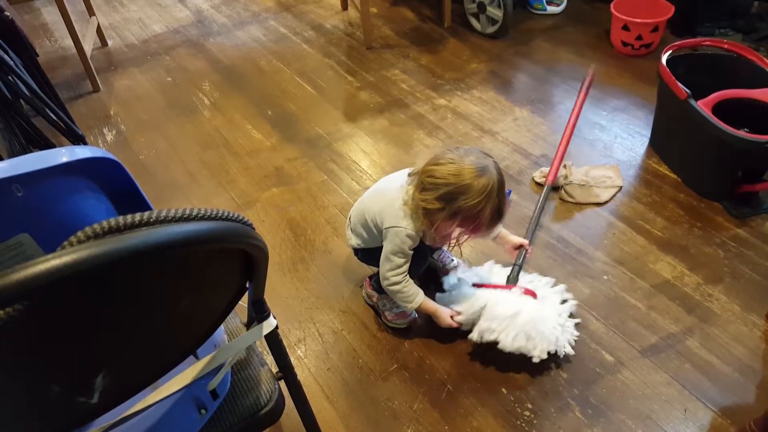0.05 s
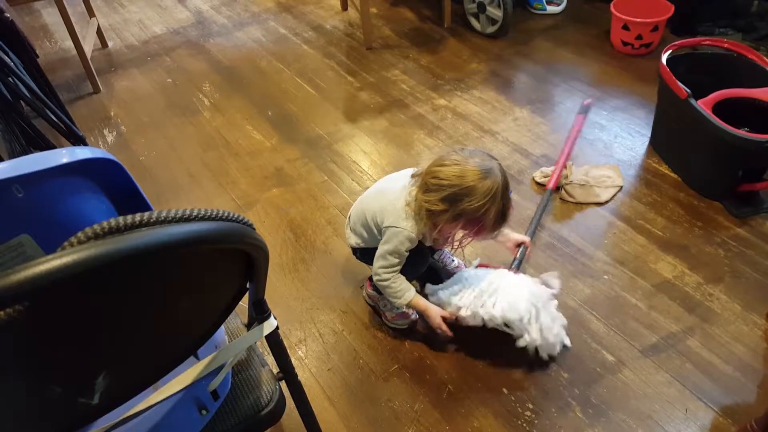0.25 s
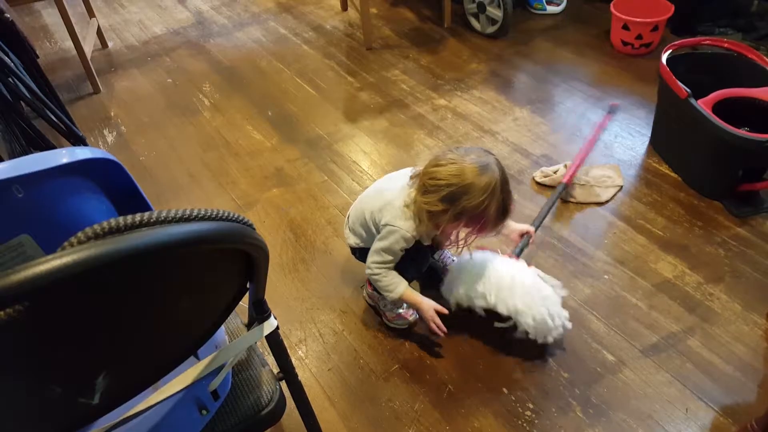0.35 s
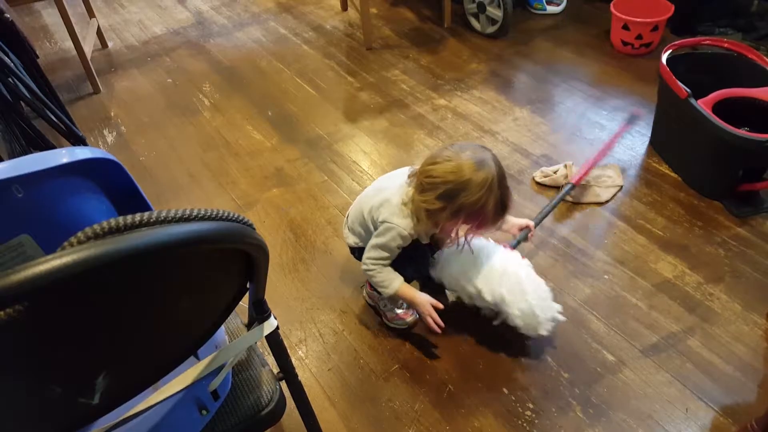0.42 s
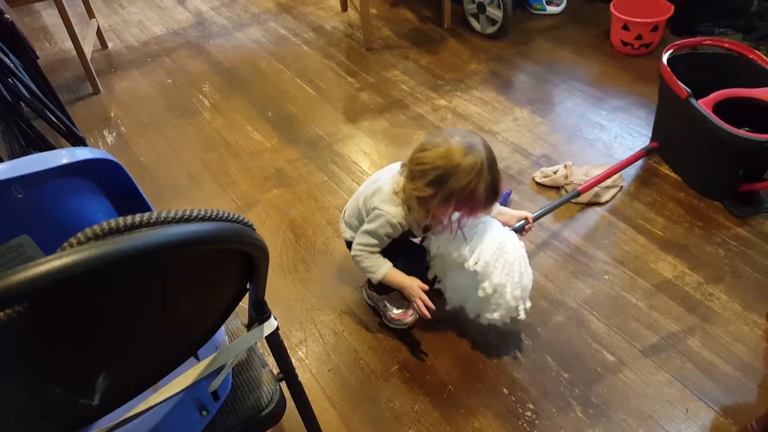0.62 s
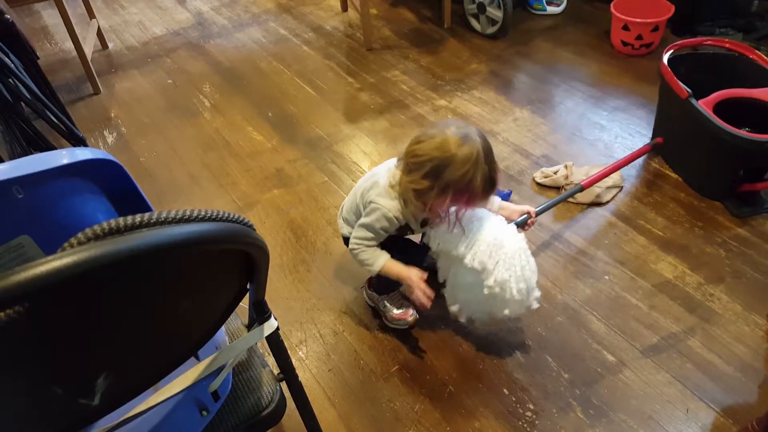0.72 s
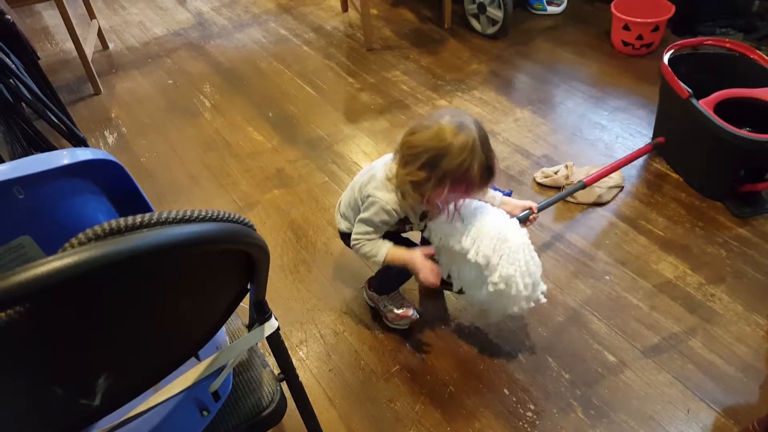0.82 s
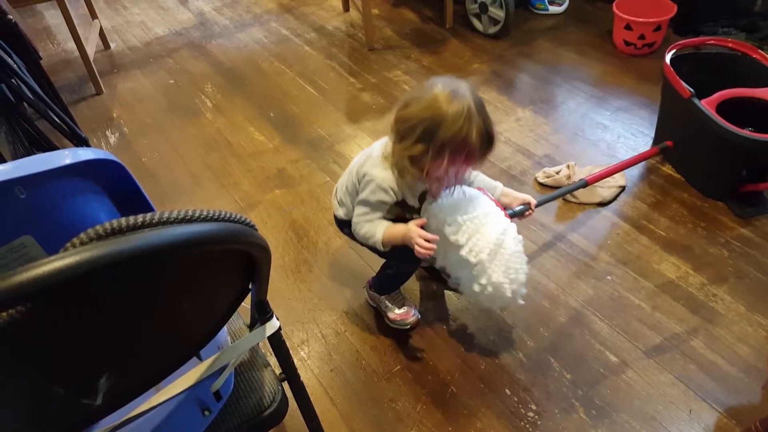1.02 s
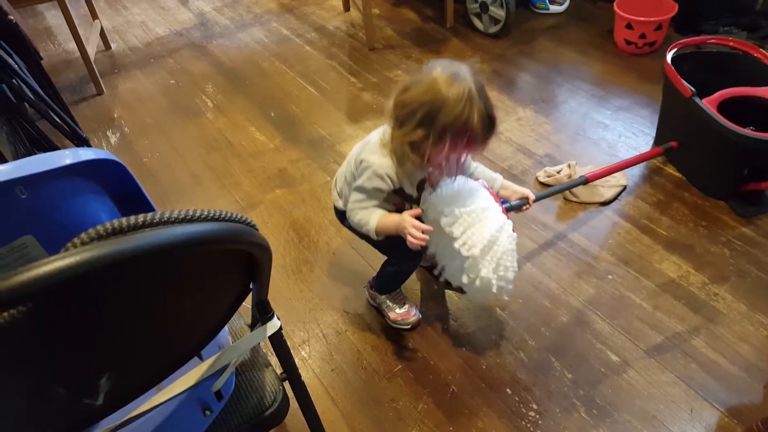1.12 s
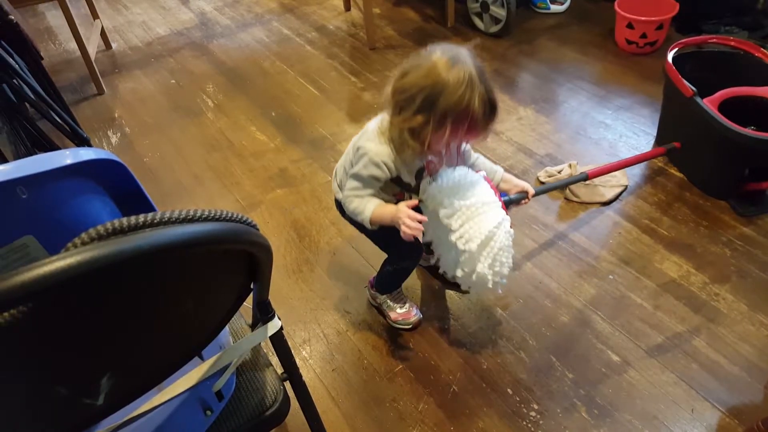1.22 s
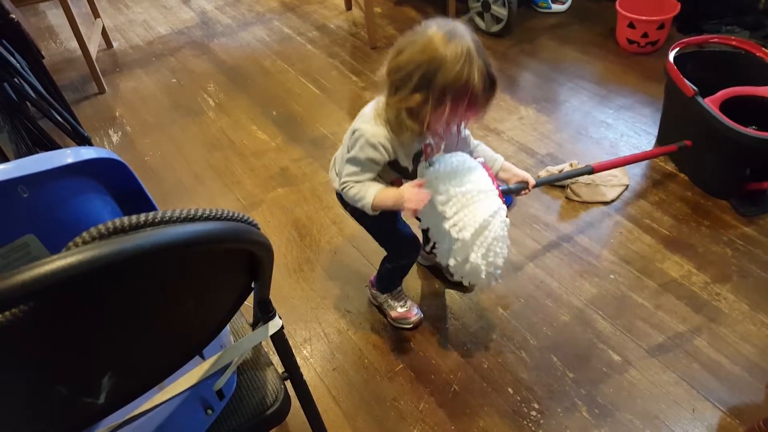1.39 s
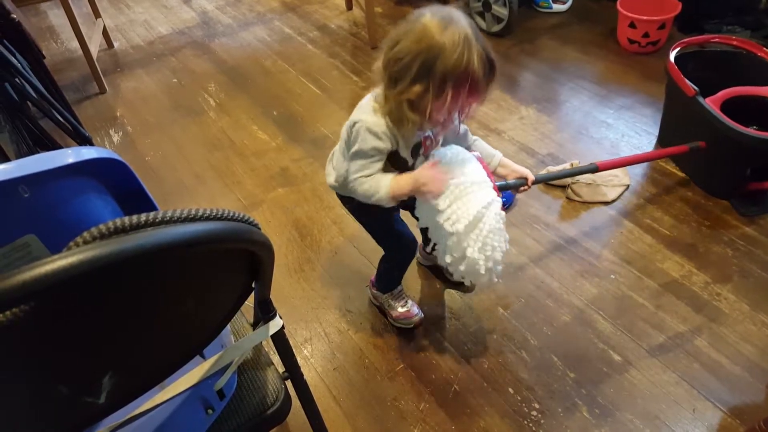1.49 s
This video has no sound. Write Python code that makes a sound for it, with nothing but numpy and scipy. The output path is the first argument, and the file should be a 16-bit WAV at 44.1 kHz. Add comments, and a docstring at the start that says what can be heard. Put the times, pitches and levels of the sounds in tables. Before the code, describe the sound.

A mop's metal handle hits a wooden floor with a sharp, ringing knock. Lighter knocks against floor and bucket follow, the plastic joint clunks, and the tip starts scraping. Heard in stereo in a slightly reverberant room.

```python
"""A sharp, ringing knock comes first: a mop's metal handle falling on the wooden floor of a live room.
The mop is being lifted by its head, and the far end of the handle knocks on against floor and bucket.
The head's plastic joint clunks a few times, then the handle's tip starts to scrape and squeak over
the wood. A stereo pair of microphones hears it all with the room's reverberation and a faint low hum."""
import sys
import numpy as np
from scipy import signal
from scipy.io import wavfile

SR = 44100
rng = np.random.default_rng(int(sys.argv[2]) if len(sys.argv) > 2 else 0)


def put_to_file(sound):
    """Save the sound as 16-bit audio at rate SR, in the file named by the first command-line argument."""
    columns = np.atleast_2d(sound).T  # one column per channel
    safe = np.clip(columns, -1, 1)
    whole_steps = np.round(safe * 32767)
    wavfile.write(sys.argv[1], SR, whole_steps.astype(np.int16))


N = 68355
TIME = np.arange(N) / SR
BANDS = 28 * 2 ** (np.arange(28) / 3)  # third-octave centres in Hz

# The handle landing on floor and bucket. Each row: start in seconds; then in dB crack, room, bass,
# middle, treble, tube ring, board ring and left over right; clack pitch in Hz, clack level in dB.
KNOCKS = [(0.1996, -11, -19.5, -2, -1.5, 0, -23.5, -22, -0.5, 1293, -19),
          (0.2061, -43, -23.5, -3.5, 10.5, 7.5, -44, -44, -10, 1923, -23.5),
          (0.5437, -23, -38.5, 6.5, -5.5, -1, -47, -46, 0.5, 2863, -26.5),
          (0.6340, -15, -28.5, -1, 0.5, 2, -42, -42.5, 0.5, 1405, -18.5),
          (0.7387, -27.5, -42.5, -3, -4.5, -5, -57, -73, 0, 1055, -27),
          (0.9259, -39, -57.5, 3.5, 4, -3, -61, -64.5, 3.5, 1074, -44.5)]
# Tone of a crack and its reverberation. Each row: frequency in Hz, third-octave level in dB.
KNOCK_COLOUR = [(30, -31.5), (70, -20), (130, -17.5), (250, -6), (440, -5), (600, -13), (800, -8),
                (1050, -6.5), (1900, -3.5), (3200, -2), (5000, -7.5), (7200, -7.5), (9000, -12.5),
                (11000, -19.5), (14000, -19.5)]
# The struck spot's damped modes. Each row: ratio to the clack pitch, level in dB, t60 in seconds.
CLACK_MODES = [(0.899, -4, 0.04), (0.998, 3, 0.047), (1.16, -19, 0.03), (1.33, -1.5, 0.035)]
# The steel tube, then the floorboards. Each row: frequency in Hz, level in dB, t60 in seconds.
TUBE_MODES = [(731.3, 2.5, 0.18), (794, -5.5, 0.29), (902, -2, 0.25), (1229, -0.5, 0.32),
              (1560, -7.5, 0.23), (1781, 2.5, 0.28), (1864, 5, 0.34), (1899, 0.5, 0.39), (2355, -5.5, 0.48),
              (2400, -7.5, 0.46), (2925, -8, .3), (3070, 0.5, 0.13), (3134, 0, 0.2), (3385, -8, 0.46),
              (3580, 3, 0.15)]
BOARD_MODES = [(63.6, -22.5, .55), (151.5, -5.5, 0.4), (228.1, 3, 0.31), (240.4, -5, 0.3), (292, 1, 0.18),
               (344.7, -14, 0.47), (432.8, -0.5, 0.36), (466.4, -7.5, 0.26)]

def handle_knocks():
    """Each knock cracks, clacks and sets tube and boards ringing; the room answers."""
    out, noise, room_power = np.zeros((2, N)), noise_bands(), 0
    bass = 1 / (1 + (BANDS / 730) ** 4)
    middle = np.exp(-(np.log2(BANDS / 1760) / 0.27) ** 2)
    treble = 1 / (1 + (5800 / BANDS) ** 4)
    low_cut = 1 / (1 + (900 / BANDS) ** 2)
    for (start, crack_db, room_db, bass_db, middle_db, treble_db,
         tube_db, boards_db, pan_db, clack_hz, clack_db) in KNOCKS:
        colour = from_db(at_bands(KNOCK_COLOUR) + bass_db * bass + middle_db * middle + treble_db * treble)
        crack = np.tensordot(colour * low_cut, noise, 1) * blow(start, rise_s=0.00039, t60=0.015)
        modes = [(clack_hz * ratio, db, t60) for ratio, db, t60 in CLACK_MODES]
        clack = struck(start, modes, rise_s=0.0003, diffuse=True)
        out += (from_db(crack_db) * crack + from_db(clack_db) * clack) * pan(pan_db)
        out += from_db(tube_db) * struck(start, TUBE_MODES, rise_s=0.0011, diffuse=True)
        out += from_db(boards_db) * struck(start, BOARD_MODES, rise_s=0.0087)
        room_power += (from_db(room_db) * colour[:, None] * room_tail(start)) ** 2
    return out + reverberation(room_power)

# Down at the floor. Each row: start in seconds, level in dB, pitch in Hz, t60 in seconds.
THUDS = [(0.545, -25, 492, 0.041), (0.638, -27.5, 387, 0.075), (0.639, -34, 158, 0.21),
         (0.644, -34.5, 68.5, 0.14), (1.207, -49, 147, 0.069)]

def floor_thuds():
    """The boards give under the heavier contacts: one short low note each."""
    return sum(struck(start, [(hz, db, t60)], rise_s=0.0019) for start, db, hz, t60 in THUDS)

# Up at the mop's head. Each row: start in seconds, ring level in dB, tick level in dB, pitch in Hz.
CLUNKS = [(0.544, -29.5, -41.5, 329), (0.563, -28, -55, 277.7), (0.739, -27.5, -48, 335.2),
          (0.9263, -26.5, -53.5, 320.4), (0.974, -40, -69, 301), (1.045, -36.5, -60.5, 306.5),
          (1.12, -36.5, -55, 323.7), (1.205, -43.5, -58, 312), (1.258, -50, -58.5, 312)]
# The plastic joint's modes. Each row: ratio to its pitch, level in dB, t60 in seconds.
JOINT_MODES = [(.5, -14.5, .2), (.85, -14.5, 0.42), (1, 1, 0.16), (1.12, -17, 0.033), (1.48, -13.5, 0.102),
               (3.2, -24, 0.08)]
# Its tick as the room returns it. Each row: frequency in Hz, third-octave level in dB.
TICK_COLOUR = [(40, -29), (150, -4.5), (400, 0.5), (650, -1), (1100, 0), (2000, -7), (3200, -9),
               (7000, -19.5), (14000, -47.5)]

def joint_clunks():
    """The head swings on its plastic joint: a hollow ring and a dull tick in the room."""
    out, room_power = np.zeros((2, N)), 0
    for start, ring_db, tick_db, hz in CLUNKS:
        modes = [(hz * ratio, db, t60) for ratio, db, t60 in JOINT_MODES]
        out += from_db(ring_db) * struck(start, modes, rise_s=0.0026)
        room_power += (from_db(tick_db + at_bands(TICK_COLOUR))[:, None] * room_tail(start)) ** 2
    return out + reverberation(room_power)

# Faint rubbing that grows into a scrape, just left of centre. Each row: time in seconds, level in dB.
SCRAPE_LEVEL = [(0, -67), (.05, -73), (.13, -87), (.17, -65.5), (.5, -70), (.9, -64.5), (1.15, -64),
                (1.27, -68.5), (1.31, -54.5), (1.37, -53), (1.39, -48), (1.44, -52), (1.47, -46.5),
                (1.515, -46.5), (1.54, -41)]
# The hiss of friction on wood. Each row: frequency in Hz, third-octave level in dB.
SCRAPE_COLOUR = [(40, -64), (150, -33.5), (320, -15.5), (600, -16), (1000, -11.5), (1800, -10), (2800, -8),
                 (5000, -18.5), (8000, -18), (10000, -36), (14000, -26.5)]
# What the dragging tip sets ringing. Each row: frequency in Hz, level in dB, t60 in seconds.
SCRAPE_MODES = [(322, 0.5, 0.17), (730, -4.5, 0.24), (950, -2.5, 0.16), (1350, -1, 0.12), (1980, 8, .06),
                (2530, -4.5, 0.16), (2790, 0.5, 0.06), (3330, -14, 0.35)]

def tip_scrape(slips_per_s=820, flicker_db=2.5):
    """The tip drags over the wood: friction hiss, and tiny slips that keep the mop ringing."""
    hiss = sum(band * from_db(db + flicker_db * drift(per_s=40))
               for band, db in zip(noise_bands(), at_bands(SCRAPE_COLOUR)))
    slips = (rng.random((2, N)) < slips_per_s / SR) * rng.standard_normal((2, N))
    slips = slips + slips[::-1] / 2  # each slip reaches both microphones
    ring = signal.fftconvolve(slips, struck(0, SCRAPE_MODES, rise_s=0.0011), axes=1)[:, :N]
    level = from_db(np.interp(TIME, *np.transpose(SCRAPE_LEVEL)))
    return level * pan(1.5) * (hiss + from_db(-2) * rms_one(ring))

# The tip on the boards. Each row: peak time in seconds, half-width in seconds, pitch in Hz, level in dB.
SQUEAKS = [(1.413, 0.053, 1350, -55), (1.5, 0.024, 960, -46.5), (1.54, .02, 2850, -48)]

def tip_squeaks():
    """The tip sticks and slips for a moment: short unsteady tones over the scrape."""
    out = np.zeros((2, N))
    for peak, half_width, hz, db in SQUEAKS:
        swell = np.exp(-((TIME - peak) / half_width) ** 2)
        phase = 2 * np.pi * (hz * TIME + rng.random((2, 1)) / 4) + drift(per_s=150) / 2
        out += from_db(db) * swell * np.sin(phase)
    return out

# The still room. Each row: frequency in Hz, third-octave level in dB.
ROOM_TONE = [(28, -77), (50, -88), (70, -67.5), (110, -78.5), (180, -72), (330, -70), (600, -80),
             (1200, -79.5), (3000, -77.5), (8000, -81), (14000, -82)]
# A low hum, alike at both microphones. Each row: time in seconds, level in dB, pitch in Hz.
HUM = [(0, -58, 178.5), (.08, -57.5, 186.5), (0.169, -61.5, 179), (0.401, -64, 185.8), (.5, -57, 184),
       (.8, -81, 171.5), (1.19, -71, 181.5), (1.25, -54.5, 189), (1.33, -53.5, 188.1), (1.384, -78, 175),
       (1.43, -55, 166), (1.55, -63, 158)]

def room_tone(octave_db=-12.5):
    """Quiet room noise with a faint wavering hum that comes and goes."""
    times, db, hz = np.transpose(HUM)
    phase = 2 * np.pi * np.cumsum(np.interp(TIME, times, hz)) / SR + drift(per_s=11.2) / 2
    hum = from_db(np.interp(TIME, times, db)) * (np.sin(phase) + from_db(octave_db) * np.sin(2 * phase))
    return np.tensordot(from_db(at_bands(ROOM_TONE)), noise_bands(), 1) + hum

# How long the room rings. Each row: frequency in Hz, t60 in seconds.
ROOM_T60 = [(50, 0.66), (160, 0.36), (420, 0.31), (1100, 0.34), (2900, 0.35), (7500, 0.29), (14000, 0.21)]

def room_tail(start):
    """Envelope of the room's answer to a click, per band; lows build later and last longer."""
    rise_s = 0.0014 + 0.73 / BANDS
    return blow(start, rise_s[:, None], at_bands(ROOM_T60)[:, None])

def reverberation(power):
    """Dense reflections: stereo noise that follows the given power in each band."""
    return np.einsum("bn,bcn->cn", np.sqrt(power), noise_bands())

# How alike the two microphones hear the room. Each row: frequency in Hz, correlation.
MIC_LIKENESS = [(50, 0.98), (130, 0.98), (260, 0.94), (550, 0.9), (1100, 0.53), (2200, 0.093), (5000, .05),
                (14000, 0.059)]
# How the room's sound leans across the pair. Each row: frequency in Hz, left over right in dB.
MIC_BALANCE = [(60, -1), (160, 1.5), (380, 0.5), (1200, -0.5), (2400, 4.5), (4400, -3), (8000, -1),
               (14000, -3.5)]

def noise_bands():
    """Third octaves of stereo noise, alike in the bass and unrelated in the treble: bands x 2 x N."""
    white, out = rng.standard_normal((2, 2, N + SR // 4)), []
    for k, (hz, alike, pan_db) in enumerate(zip(BANDS, at_bands(MIC_LIKENESS), at_bands(MIC_BALANCE))):
        sos = signal.butter(2, [hz / 2 ** (1 / 6), hz * 2 ** (1 / 6)], "band", fs=SR, output="sos")
        mid, side = signal.sosfilt(sos, white[k % 2])[:, -N:]
        pair = np.sqrt(1 + alike) * mid + np.sqrt(1 - alike) * side * [[1], [-1]]
        out.append(rms_one(pair) * pan(pan_db))
    return np.array(out)

def struck(start, modes, rise_s, diffuse=False, scatter_db=1):
    """Modes set ringing by a blow; diffuse ones reach each microphone in a phase of their own."""
    out = np.zeros((2, N))
    for hz, db, t60 in modes:
        phase = 2 * np.pi * rng.random((2, 1)) * diffuse
        gain = from_db(db + scatter_db * rng.standard_normal())
        out += gain * blow(start, rise_s, t60) * np.sin(2 * np.pi * hz * (TIME - start) + phase)
    return out

def blow(start, rise_s, t60):
    """Envelope of a blow: a quick rise, and a decay of 60 dB in t60 seconds."""
    age = np.maximum(TIME - start, 0)
    return (1 - np.exp(-age / rise_s)) * np.exp(-np.log(1000) * age / t60)

def drift(per_s):
    """Random wander with a spread near 1."""
    return np.interp(TIME * per_s, np.arange(512), rng.standard_normal(512))

def at_bands(points):
    """Read a table at the band centres, on a log-frequency axis."""
    hz, value = np.transpose(points)
    return np.interp(np.log(BANDS), np.log(hz), value)

def pan(db):
    """Gains that put the left microphone db above the right."""
    return from_db([[db / 2], [-db / 2]])

def from_db(db):
    """Decibels to gain."""
    return 10 ** (np.asarray(db) / 20)

def rms_one(x):
    """Scale to unit power."""
    return x / np.sqrt(np.mean(x ** 2) + 1e-20)

def scene():
    """The mop in front, the quiet room behind it."""
    return handle_knocks() + floor_thuds() + joint_clunks() + tip_scrape() + tip_squeaks() + room_tone()

def record(dry, left_lag_s=0.0002, dip_hz=10110, dip_share=0.75, cutoff_hz=15800):
    """Sound reaches the left microphone a little later; the treble has a dip and the top is cut."""
    late_left = np.pad(dry[0], (round(left_lag_s * SR), 0))[:N]
    pair = np.array([late_left, dry[1]])
    notched = signal.lfilter(*signal.iirnotch(dip_hz, Q=4.9, fs=SR), pair)
    pair += dip_share * (notched - pair)
    return signal.sosfilt(signal.ellip(10, .2, 70, cutoff_hz, fs=SR, output="sos"), pair)

dry = scene()
out = record(dry)
put_to_file(out)
```